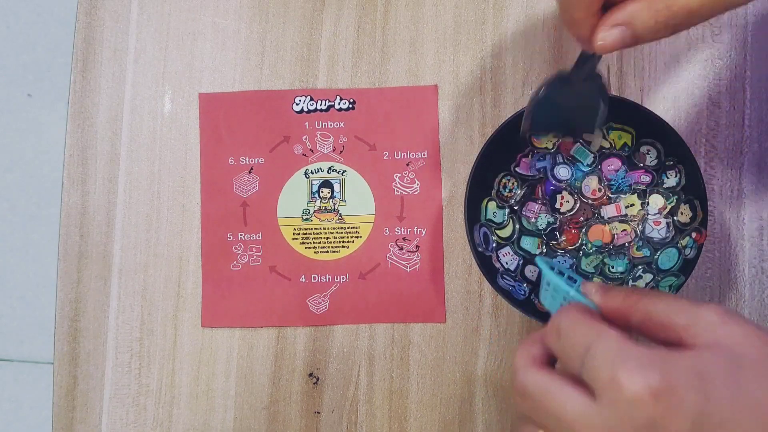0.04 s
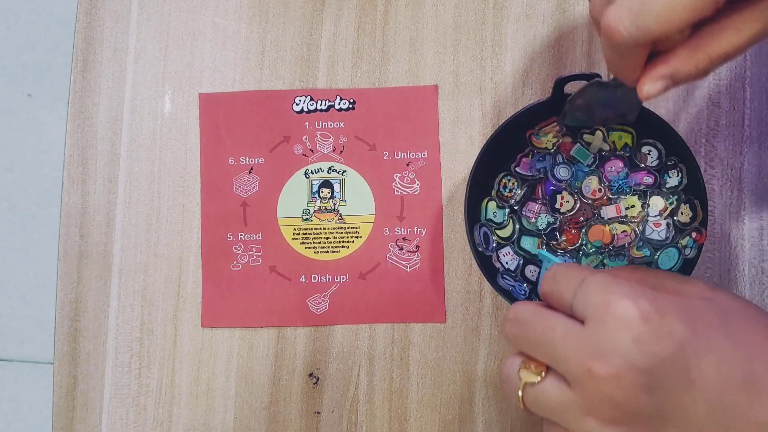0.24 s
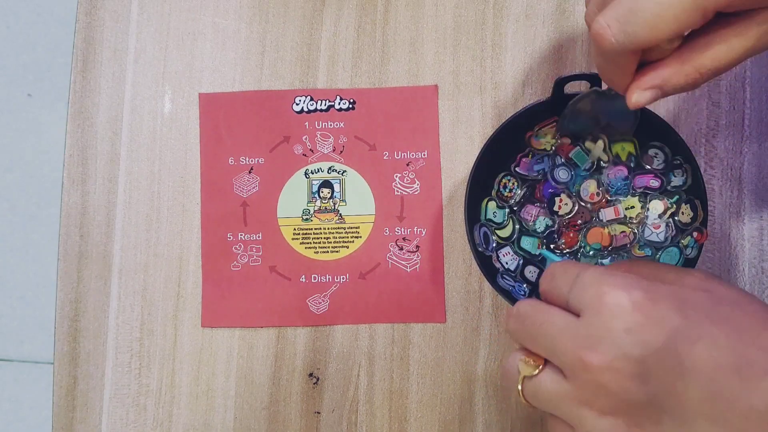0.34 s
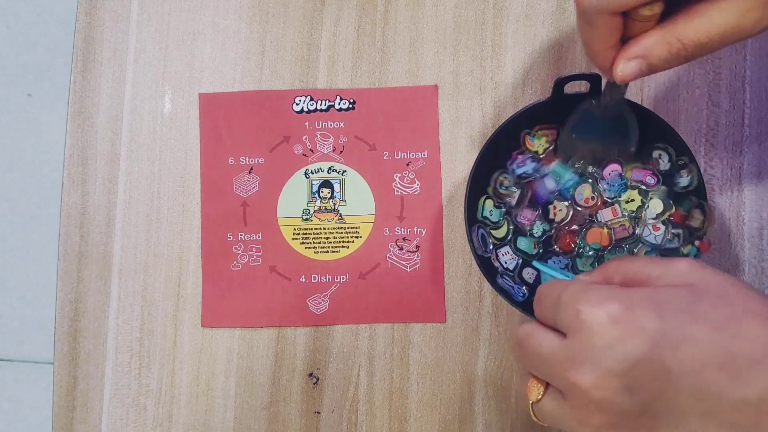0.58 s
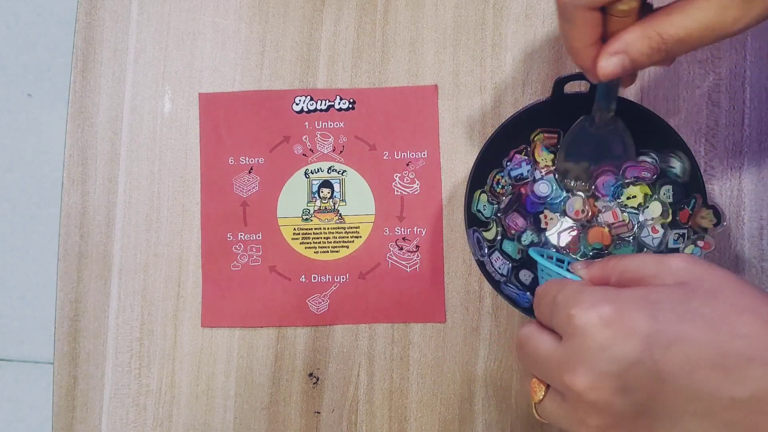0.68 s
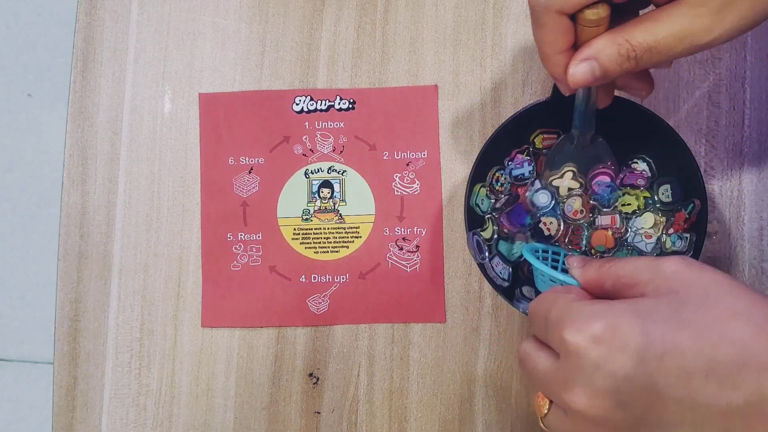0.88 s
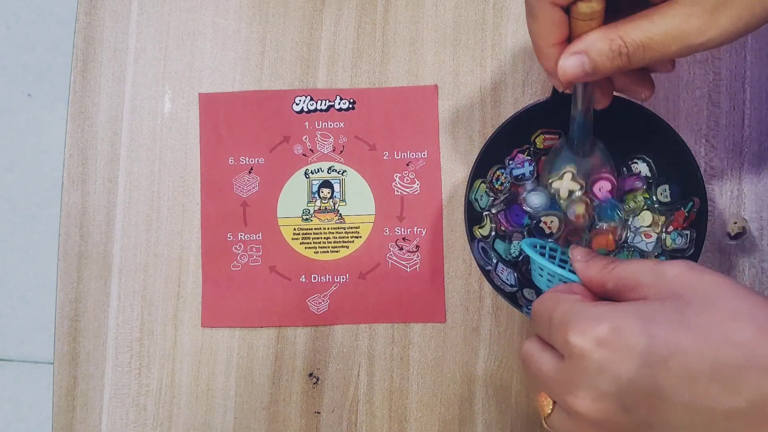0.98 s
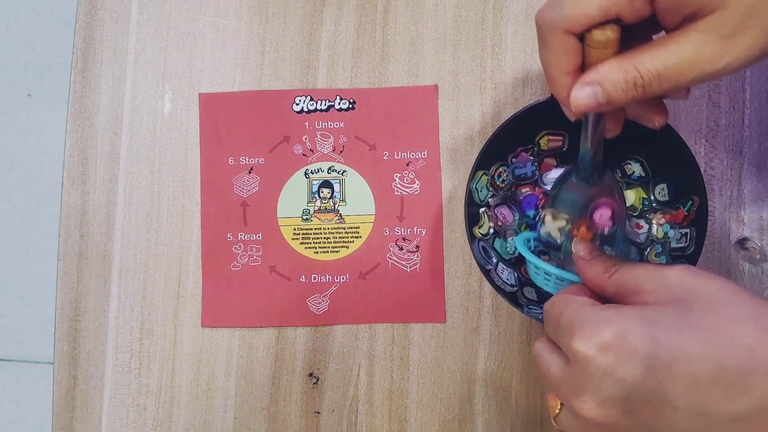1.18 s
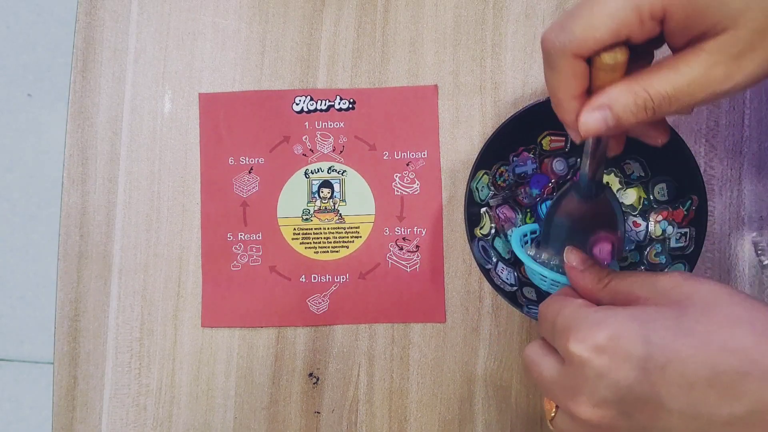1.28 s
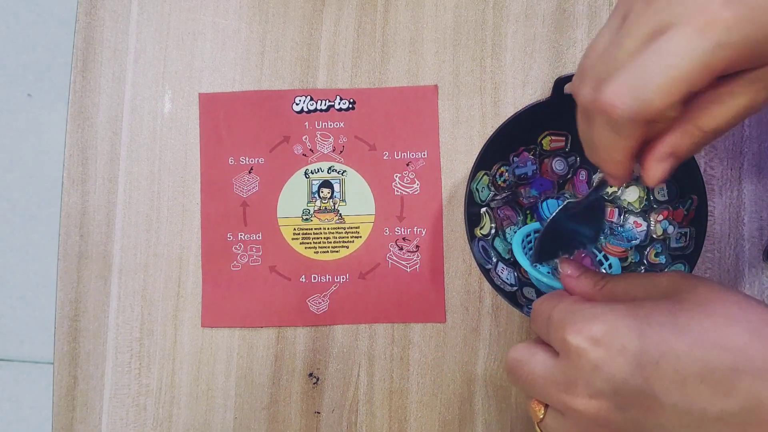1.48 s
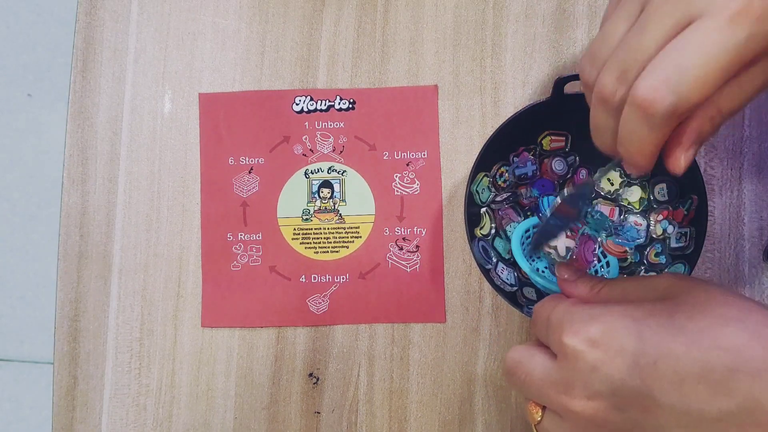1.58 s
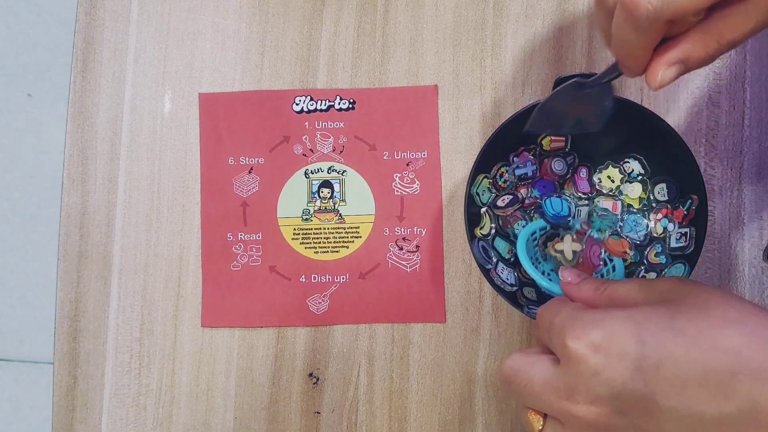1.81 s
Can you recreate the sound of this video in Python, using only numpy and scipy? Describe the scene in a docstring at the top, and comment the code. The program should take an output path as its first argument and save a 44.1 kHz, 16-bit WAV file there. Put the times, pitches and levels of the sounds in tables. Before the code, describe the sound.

Metal charms clinking and rattling as a little spatula taps, scrapes and scoops in a tiny wok.

```python
"""A quiet room is heard first; then a small metal spatula taps the rim of a miniature wok, close by.
The blade gives one very short scrape and two longer ones along the pan (stick-slip noise driving
resonances), then digs into metal charms. They clatter and clink (cracks and decaying modes) and slide
(dense random contacts), and the wok knocks on its wooden table (a few low modes) before the heap comes
to rest. A short room tail follows the sounds."""
import sys
import numpy as np
from scipy import signal
from scipy.fft import rfft, irfft
from scipy.io import wavfile
from scipy.ndimage import uniform_filter1d

SR = 44100
rng = np.random.default_rng(int(sys.argv[2]) if len(sys.argv) > 2 else 0)


def wav_record(signal):
    """Record a signal, one row per channel, as 16-bit PCM in the file named by sys.argv[1]."""
    frames = np.transpose(np.atleast_2d(signal))
    bounded = np.clip(frames, -1, 1)
    # unit amplitude maps onto the largest positive 16-bit level
    quanta = np.round(bounded * 32767).astype(np.int16)
    wavfile.write(sys.argv[1], SR, quanta)


N = 81585

# stereo field: correlation of left and right [f/Hz, correlation]; left over right [f/Hz, level/dB]
LIKENESS = [(380, .96), (1400, .4), (6000, 0)]
BALANCE = [(350, -3.5), (1200, -5), (4500, -2), (10000, 0)]
# spectrum of the room noise [f/Hz, level/dB]
FLOOR_COLOUR = [(45, 5), (145, -6.5), (350, -4), (600, -16.5), (2000, -23), (2900, -41), (9500, -39),
                (15000, -62.5)]
# wok base rubbing on the table [t/s, level/dB] and its spectrum [f/Hz, level/dB]
RUB = [(0.2, -51), (1.52, -49), (1.71, -42), (1.9, -48)]
RUB_COLOUR = [(60, -7), (145, -1.5), (260, -7.5), (420, -12.5), (2500, -51)]
# blade taps on the rim [t/s, level/dB]
TAPS = [(0.2045, -25.5), (0.212, -30), (0.45, -45)]
# modes of the blade [f/Hz]
BLADE = [5281, 6062, 7246, 8280, 8780, 10210, 12470, 13030, 13550, 14520, 14980]
# spectrum of a tap's dense ring [f/Hz, level/dB]
TAP_COLOUR = [(100, -9), (400, 17.5), (1100, -2.5), (2100, -3.5), (3200, -9.5), (5000, -2.5), (8500, 2.5),
              (11500, -4), (15000, -8)]
# pressure of the blade on the pan [t/s, level/dB]
SCRAPE = [(0.235, -42), (0.259, -35.5), (0.30, -50), (0.355, -30.5), (0.395, -31.5), (0.425, -46),
          (0.49, -62), (0.545, -47), (0.58, -34.5), (0.628, -27), (0.662, -30.5), (0.694, -29.5),
          (0.772, -38.5), (0.86, -36)]
# spectra of the scraped pan body and of the rasping edge [f/Hz, level/dB]
PAN_COLOUR = [(120, -38), (260, -21), (420, -0.5), (620, -6.5), (1350, -22.5), (1800, -5), (2800, -33),
              (6000, -30)]
RASP_COLOUR = [(1500, 0.5), (3400, -19.5), (4300, 1.5), (6000, -4.5), (8000, 1), (11000, -6.5),
               (13000, -8.5), (15500, -7)]
# pan resonances [f/Hz, level/dB]
PAN = [(385, -4), (440, 2), (500, -4), (716, -6), (1010, -8), (1720, -6), (1960, -8)]
# the edge biting into the pan [t/s, level/dB] and its resonances [f/Hz]
BITES = [(0.372, -41), (0.605, -36), (0.630, -32)]
EDGE = [4080, 4280, 4600, 5210, 8050]
# the heap sliding under the blade [t/s, level/dB] and its spectrum [f/Hz, level/dB]
SLIDE = [(0.79, -33), (0.95, -41.5), (1.11, -32.5), (1.30, -33.5), (1.36, -35), (1.39, -33.5),
         (1.47, -38.5), (1.595, -42.5), (1.63, -59), (1.9, -89)]
SLIDE_COLOUR = [(120, -2), (390, 17.5), (600, 10), (1200, 6), (4200, 2.5), (7800, -5.5), (15500, -10.5)]
# charms clashing with each other and the pan [t/s, level/dB, tilt of the crack/(dB/octave)]
CLACKS = [(0.7936, -12.5, 7), (0.7976, -19.5, -4.5), (0.8115, -12.5, 18), (0.852, -21, 8.5),
          (0.8536, -7.5, 7), (0.88, -14.5, 3.5), (0.9511, -14, 1), (0.957, -21.5, -1.5), (1.0651, -20, 5.5),
          (1.0718, -15.5, 0), (1.148, -15, 5), (1.196, -26, 10), (1.204, -22.5, -5.5), (1.269, -23, 0.5),
          (1.311, -27, -4), (1.367, -20, 7), (1.4321, -25, 5), (1.469, -27, 6)]
# spectra of the crack and of the heap ringing after it [f/Hz, level/dB]
CRACK_COLOUR = [(120, -10.5), (400, -0.5), (650, -9.5), (1400, 6.5), (3000, -0.5), (9000, -7.5),
                (15500, -14.5)]
HEAP_COLOUR = [(150, -45.5), (420, 8.5), (900, -8.5), (1400, -2.5), (2600, 5.5), (4500, 3), (7400, 2.5),
               (9000, -6.5), (15500, -13.5)]
# modes of the wok before random detuning [f/Hz]
WOK = [806, 1218, 1690, 2025, 2485, 3150]
# clinks of single charms [t/s, level/dB, most excited f/Hz]
CLINKS = [(0.8037, -14, 9200), (0.8126, -12, 10800), (1.0549, -11.5, 10600), (1.092, -14, 11200),
          (1.1291, -10, 10060), (1.173, -15.5, 9200), (1.1985, -6, 8720), (1.281, -18.5, 7650),
          (1.591, -33.5, 10750)]
# modes of a charm damped by the heap, before random variation [f/Hz, level/dB]
CHARM = [(7950, 8), (8140, -3.5), (9700, -0.5), (10770, -6), (12470, -0.5), (15000, 4)]
# spectrum of a clink's first instant [f/Hz, level/dB]
SNAP_COLOUR = [(1000, -32.5), (5500, -13), (8000, 17.5), (10500, -19), (15500, 3)]
# single charms ringing freely until touched [t/s, length/s, level/dB, f/Hz]
FREE_RINGS = [(1.2, .1, -31, 8000), (1.372, .032, -29.5, 10756)]
# wok knocking on the table [t/s, level/dB]
KNOCKS = [(1.2123, -4), (1.228, -7.5), (1.287, -15), (1.2919, -14.5)]
# joint modes of wok and table [f/Hz, level/dB, t60/s]
TABLE = [(352, -9.5, 0.063), (413, -4.5, 0.03), (692, -14.5, 0.028), (1180, -7.5, 0.015)]
# spectrum of the room tail [f/Hz, level/dB]
ROOM_COLOUR = [(2000, -0.5), (8000, -2), (15000, 0)]

LOW_CUT_HZ, EDGE_HZ, CEILING = 36, 15900, .85  # EDGE_HZ: top of the band
FLOOR_DB = -43
RUB_RING_HZ, RUB_RING_DB, RUB_RING_T60_S = 144, -.5, .25
PARTIALS_LOW_HZ, MODE_SPREAD_DB = 992, 3
BLADE_DB, MEAN_BLADE_T60_S = -1.5, .15
TAP_CRACK_DB, TAP_BODY_DB, TAP_T60_S, TAP_PARTIALS_DB = 5, -3, .098, -3
CRACK_T60_S = .022
SLIPS_PER_S, SLIP_SPREAD_DB = 2600, 3.2
STUTTER_DB, STUTTER_S = 1.8, .003  # rms swing; smoothing window
PAN_T60_S, PAN_LIMIT_DB, PAN_NOISE_DB = .042, -31, -2.5
BITE_S, EDGE_T60_S = .012, .018  # BITE_S: standard deviation of the bell-shaped envelope
RASP_DB, RASP_GROWTH = 10.5, 1.422  # rasp follows pressure to the power RASP_GROWTH
TOUCHES_PER_S, TOUCH_SPREAD_DB = 2100, 1
CHATTER_PER_S, CHATTER_DB, CHATTER_SPREAD_DB, CHATTER_T60_S = 420, -2, 2, .014
CHATTER_LOW_HZ, CHATTER_HIGH_HZ = 3000, 12500
HEAP_T60_S, HEAP_RISE_S, HEAP_PARTIALS_DB = .18, .00057, -5
RING_DB, DULL_RING_DB = -6.5, .77  # ring after an untilted crack; ring lost per dB/octave of tilt
WOK_DB, WOK_T60_S, WOK_DETUNE = -4, .093, .035
CHARM_T60_S, CHARM_DETUNE = .017, .012
CLINK_WIDTH_OCT, CLINK_PAN_DB = .14, 3  # excitation half-width; left over right
SNAP_DB, SNAP_T60_S = -4.5, .013
FREE_T60_S, DAMPING_S = .4, .0042  # free decay; time constant once touched
KNOCK_LOW_HZ, KNOCK_RISE_S = 201.6, .00035
ROOM_DB, ROOM_T60_S, ROOM_DELAY_S = -7.5, .21, .00083


def amp(db):
    """Logarithmic level: decibels to amplitude gain."""
    return 10 ** (np.asarray(db) / 20)


def unit(x):
    """Normalisation: scales a signal to rms 1."""
    return x / np.sqrt(np.mean(x ** 2) + 1e-20)


def read(points, hz):
    """Spectral interpolation: reads a table on a log-frequency axis."""
    f, value = np.transpose(points)
    return np.interp(np.log(hz + 1), np.log(f + 1), value)


def level(points):
    """Envelope: gain linear in decibels between (t/s, level/dB) points, silent outside them."""
    s, db = np.transpose(points)
    return amp(np.interp(np.arange(N) / SR, s, db, left=-120, right=-120))


def add(mix, s, sound):
    """Superposition: adds a stereo sound to the mix from time s."""
    part = mix[:, round(s * SR):][:, :sound.shape[1]]
    part += sound[:, :part.shape[1]]


def age():
    """Time axis: seconds since a hit, for a third of a second."""
    return np.arange(SR // 3) / SR


def fade(t60):
    """Exponential damping: the amplitude falls by 60 dB in t60 seconds."""
    return np.exp(-np.log(1000) * age() / max(t60, 1e-3))


def convolve(x, response):
    """Linear resonance: drives an impulse response with x, normalised to rms 1."""
    return unit(signal.fftconvolve(x, response, axes=1)[:, :N])


def paint(x, colour, tilt=0):
    """Linear filtering and correlation: gives two unrelated signals a spectrum and a stereo place."""
    hz = np.fft.rfftfreq(x.shape[1], 1 / SR)
    a, b = rfft(x)
    same = np.clip(read(LIKENESS, hz), -1, 1)
    stereo = np.array([a, same * a + np.sqrt(1 - same ** 2) * b])
    stereo = stereo * amp(np.outer([.5, -.5], read(BALANCE, hz)))
    # the tilt acts above 1 kHz
    spectrum = amp(read(colour, hz) + tilt * np.log2(np.maximum(hz, 1000)))
    return unit(irfft(stereo * spectrum, x.shape[1]))


def burst(colour, t60, tilt=0):
    """High modal density: modes too close to tell apart act as decaying noise."""
    return paint(rng.standard_normal((2, len(age()))), colour, tilt) * fade(t60)


def ring(modes):
    """Modal synthesis: damped sines whose phase differs between microphones where likeness is low."""
    out = 0
    for hz, db, t60 in modes:
        phase_gap = np.array([[0], [rng.uniform(-0.24, 0.66)]])
        turn = rng.random() + phase_gap * (1 - read(LIKENESS, hz))  # in cycles
        place = amp(np.array([[.5], [-.5]]) * read(BALANCE, hz))
        out = out + amp(db) * place * fade(t60) * np.sin(2 * np.pi * (hz * age() + turn))
    return out / np.sqrt(sum(amp(db) ** 2 for _, db, _ in modes) / 2)


def alike(frequencies, t60):
    """Equal excitation: modes of equal strength and decay."""
    return [(hz, 0, t60) for hz in frequencies]


def varied(modes, detune):
    """Contact variation: no two contacts excite the same modes alike."""
    draws = rng.uniform(-1.1, 1, (len(modes), 2))
    return [(hz * (1 + detune * a), db + MODE_SPREAD_DB * b, t60)
            for (hz, db, t60), (a, b) in zip(modes, draws)]


def partials(colour, t60, count):
    """Inharmonic resonance: unrelated partials of small metal parts, following a spectrum."""
    hz, loss, life = rng.random((count, 3)).T
    hz = PARTIALS_LOW_HZ + hz * (EDGE_HZ - PARTIALS_LOW_HZ)
    return ring(list(zip(hz, read(colour, hz) - 10 * loss, t60 * (.5 + life))))


def contacts(per_s, spread_db):
    """Random impacts: tiny contacts of uneven size, each about a millisecond of crackle."""
    size = amp(spread_db * np.minimum(rng.exponential(1, N), 4))
    hits = (rng.random(N) < per_s / SR) * size
    power = signal.lfilter([1], [1, -np.exp(-1 / (0.0014 * SR))], hits ** 2)
    return np.sqrt(power) * rng.standard_normal((2, N))


def background():
    """Broadband noise and friction: room noise, and the wok's base rubbing a low hum from the table."""
    floor, rub = rng.standard_normal((2, 2, N))
    hum = convolve(rub[:1], ring([(RUB_RING_HZ, 0, RUB_RING_T60_S)]))
    hum = signal.sosfilt(signal.butter(2, 2 * RUB_RING_HZ, fs=SR, output="sos"), hum)
    rubbing = paint(rub[:, ::-1], RUB_COLOUR) + amp(RUB_RING_DB) * hum
    return amp(FLOOR_DB) * paint(floor, FLOOR_COLOUR) + level(RUB) * rubbing


def taps():
    """Impulsive excitation: the blade hits the rim and rings, and the pan gives a short knock."""
    out = np.zeros((2, N))
    for s, db in TAPS:
        modes = [(hz, 0, MEAN_BLADE_T60_S * (.5 + rng.random())) for hz in BLADE]
        blade = amp(BLADE_DB) * ring(modes)
        rim = amp(TAP_PARTIALS_DB) * partials(TAP_COLOUR, MEAN_BLADE_T60_S, count=50)
        crack = amp(TAP_CRACK_DB) * burst(TAP_COLOUR, CRACK_T60_S)
        body = amp(TAP_BODY_DB) * burst(TAP_COLOUR, TAP_T60_S)
        add(out, s, amp(db) * (crack + body + blade + rim))
    return out


def scrapes():
    """Stick-slip friction: the edge rasps and drives the pan; hard pressure adds rasp rather than body."""
    stutter = uniform_filter1d(rng.standard_normal(N), round(STUTTER_S * SR))
    stutter = unit(uniform_filter1d(stutter, round(STUTTER_S * SR / 2)))
    slips = contacts(SLIPS_PER_S, SLIP_SPREAD_DB) * amp(STUTTER_DB * stutter)
    pressure = level(SCRAPE)

    pan = convolve(slips[:1], ring([(hz, db, PAN_T60_S) for hz, db in PAN]))
    limit = amp(PAN_LIMIT_DB)
    body_level = limit * np.tanh(pressure / limit)  # the body saturates under pressure
    body = body_level * (amp(PAN_NOISE_DB) * paint(slips, PAN_COLOUR) + pan)

    t = np.arange(N) / SR
    bite = sum(amp(db) * np.exp(-((t - s) / BITE_S) ** 2 / 2) for s, db in BITES)
    edge = convolve(slips, ring(alike(EDGE, EDGE_T60_S)))
    rasp = amp(RASP_DB) * pressure ** RASP_GROWTH * paint(slips, RASP_COLOUR)
    return body + bite * edge + rasp


def slide():
    """Granular friction: many light touches as the heap is pushed along."""
    return level(SLIDE) * paint(contacts(TOUCHES_PER_S, TOUCH_SPREAD_DB), SLIDE_COLOUR)


def chatter():
    """Random impacts: loose charms of all sizes tick in the sliding heap, each with a few short partials."""
    out = np.zeros((2, N))
    strength = amp(CHATTER_DB) * level(SLIDE)
    t = age()[:round(2 * CHATTER_T60_S * SR)]
    for at in np.flatnonzero(rng.random(N) < CHATTER_PER_S / SR):
        hz = rng.uniform(CHATTER_LOW_HZ, CHATTER_HIGH_HZ, size=(5, 1))
        tick = rng.standard_normal((2, len(hz))) @ np.sin(2 * np.pi * hz * t)
        db = CHATTER_SPREAD_DB * rng.uniform(-3.2, 1)
        add(out, at / SR, strength[at] * amp(db) * unit(tick) * fade(CHATTER_T60_S)[:len(t)])
    return out


def clatter():
    """Impact and modal decay: a short crack, after which the heap, loose charms and the wok ring."""
    out = np.zeros((2, N))
    for s, db, tilt in CLACKS:
        wok = amp(WOK_DB) * ring(varied(alike(WOK, WOK_T60_S), WOK_DETUNE))
        loose = amp(HEAP_PARTIALS_DB) * partials(HEAP_COLOUR, HEAP_T60_S, count=30)
        after = burst(HEAP_COLOUR, HEAP_T60_S, tilt / 2) + wok + loose
        rise = 1 - np.exp(-age() / HEAP_RISE_S)
        after = after * rise * amp(RING_DB - DULL_RING_DB * tilt)
        add(out, s, amp(db) * (burst(CRACK_COLOUR, CRACK_T60_S, tilt) + after))
    return out


def clinks():
    """Selective modal excitation: charms snap on metal, the contact point favouring some modes."""
    out = np.zeros((2, N))
    for s, db, centre_hz in CLINKS:
        modes = []
        for hz, mode_db in CHARM:
            distance = np.log2(hz / centre_hz) / CLINK_WIDTH_OCT
            modes.append((hz, mode_db - 20 * np.log10(1 + distance ** 2), CHARM_T60_S))
        snap = amp(SNAP_DB) * burst(SNAP_COLOUR, SNAP_T60_S)
        sound = ring(varied(modes, CHARM_DETUNE)) + snap
        add(out, s, amp(db + np.array([[.5], [-.5]]) * CLINK_PAN_DB) * sound)
    return out


def free_rings():
    """Light damping: single charms ring freely until a touch damps them quickly."""
    out = np.zeros((2, N))
    for s, length, db, hz in FREE_RINGS:
        touch = np.exp(-np.maximum(age() - length, 0) / DAMPING_S)
        add(out, s, amp(db) * ring([(hz, 0, FREE_T60_S)]) * touch)
    return out


def knocks():
    """Coupled modes and weak radiation: wok and wood thud, but the wok is too small for deep bass."""
    out = np.zeros((2, N))
    thud = -sum(amp(db) * fade(t60) * np.sin(2 * np.pi * hz * age()) for hz, db, t60 in TABLE)
    thud = thud * (1 - np.exp(-age() / KNOCK_RISE_S))
    thud = signal.sosfilt(signal.butter(2, KNOCK_LOW_HZ, "high", fs=SR, output="sos"), thud)
    for s, db in KNOCKS:
        add(out, s, amp(db + np.array([[-1], [1]])) * thud)  # right 2 dB over left
    return out


def room(x):
    """Reverberation: a small room's short tail as dense, decaying reflections."""
    tail = burst(ROOM_COLOUR, ROOM_T60_S) * (age() > ROOM_DELAY_S)
    return signal.fftconvolve(x, tail / np.linalg.norm(tail[0]), axes=1)[:, :N]


def scene():
    """Superposition: the background, everything in the wok, and the room's answer."""
    wok = taps() + scrapes() + slide() + chatter() + clatter() + clinks() + free_rings() + knocks()
    return background() + wok + amp(ROOM_DB) * room(wok)


def record(dry):
    """Transduction: the microphone's bass roll-off, a soft ceiling on sharp peaks, and the band limit."""
    dry = signal.sosfilt(signal.butter(4, LOW_CUT_HZ, "high", fs=SR, output="sos"), dry)
    dry = dry / (1 + (dry / CEILING) ** 6) ** (1 / 6)
    low_pass = signal.firwin(401, EDGE_HZ, window=("kaiser", 8), fs=SR)
    return signal.oaconvolve(dry, low_pass[None], "same")


dry = scene()
out = record(dry)
wav_record(out)
```